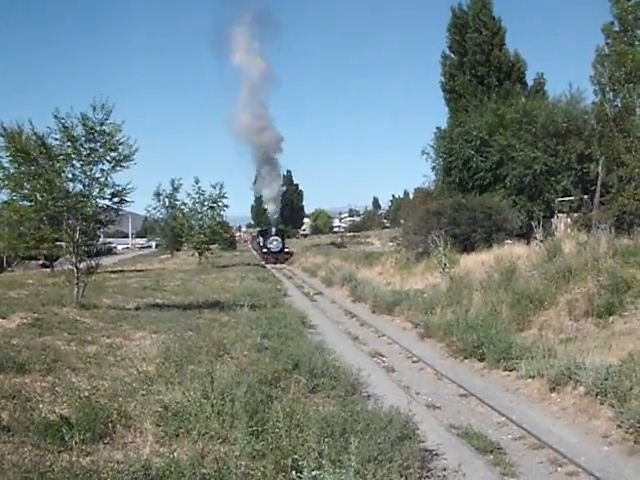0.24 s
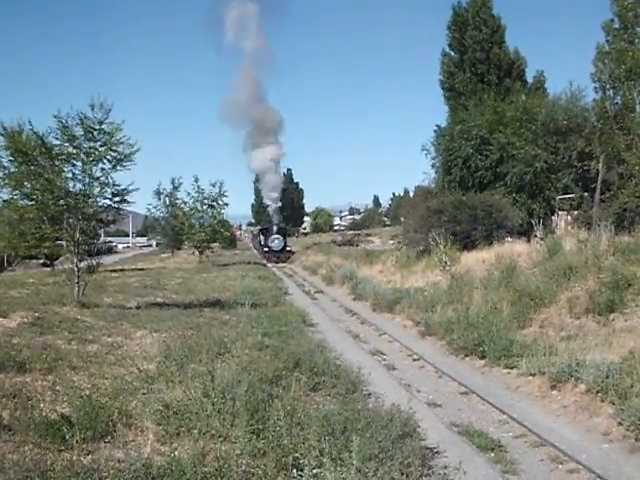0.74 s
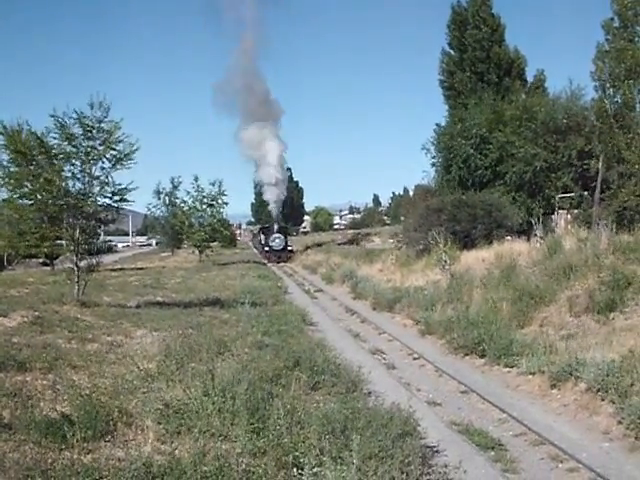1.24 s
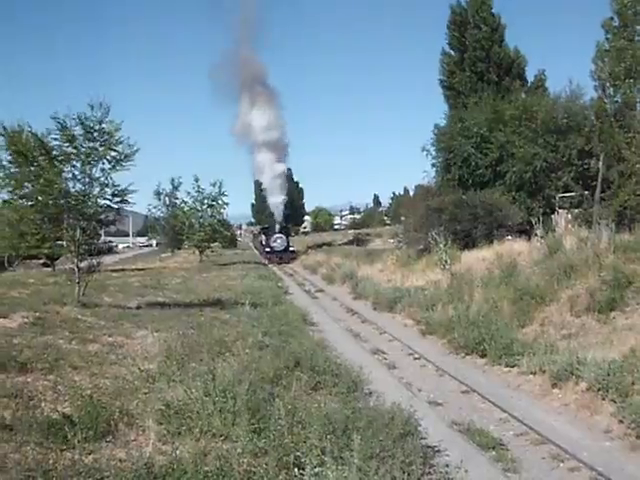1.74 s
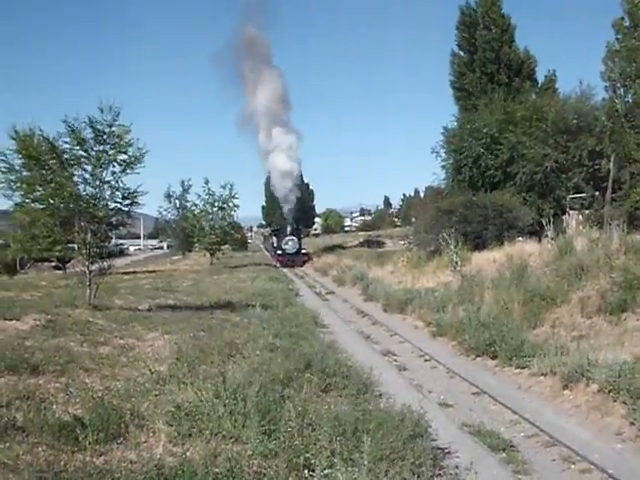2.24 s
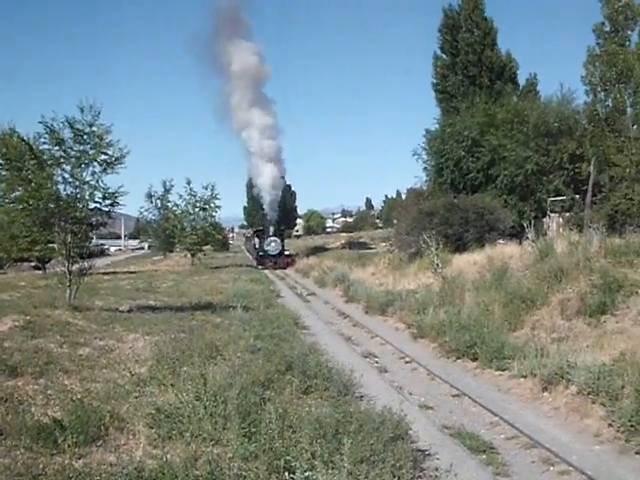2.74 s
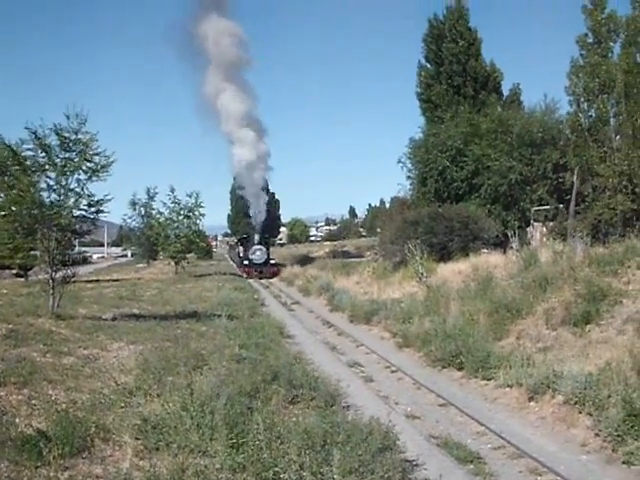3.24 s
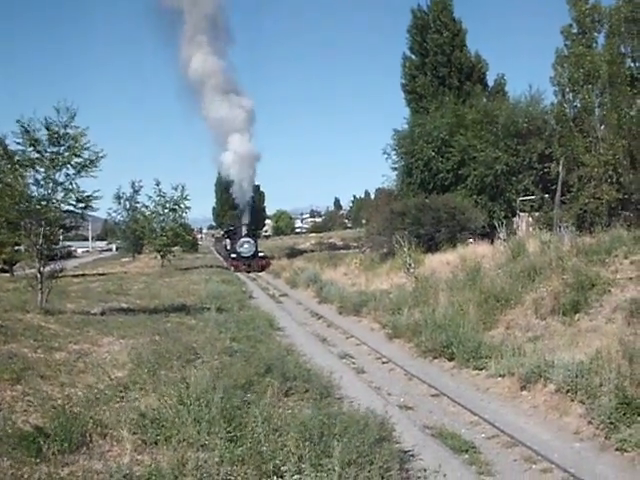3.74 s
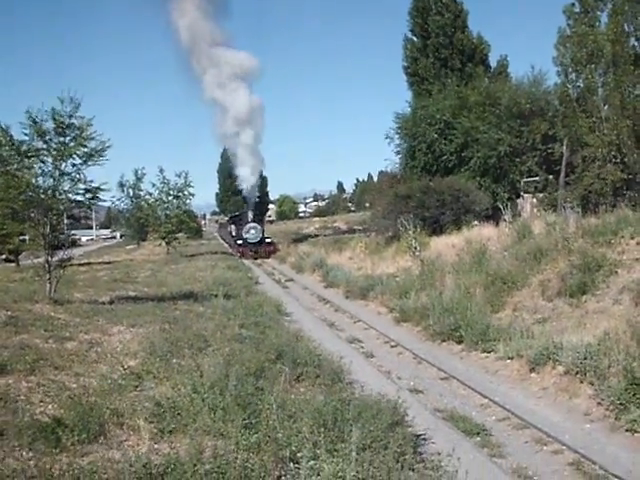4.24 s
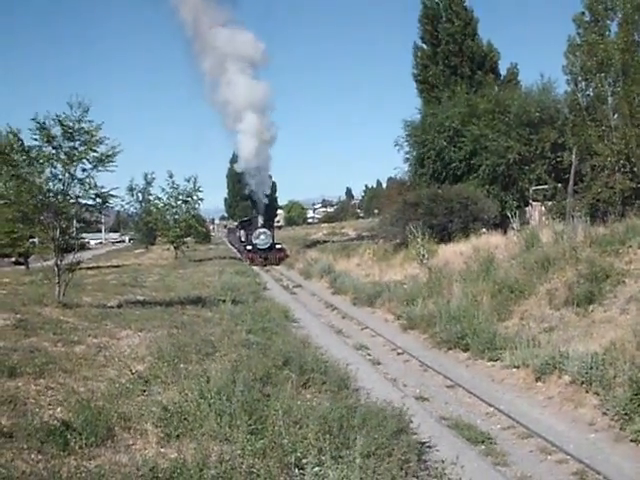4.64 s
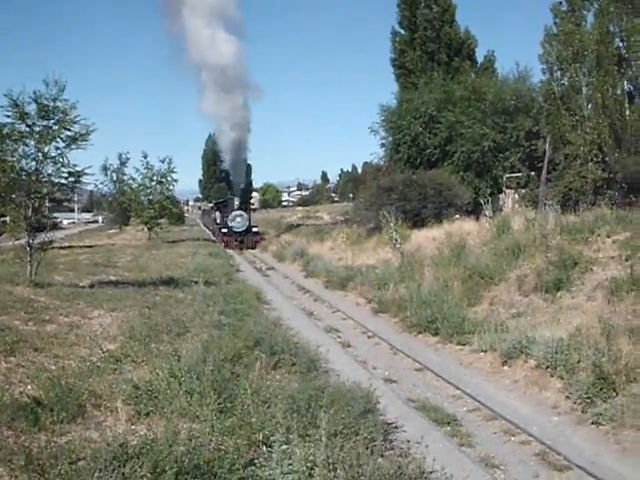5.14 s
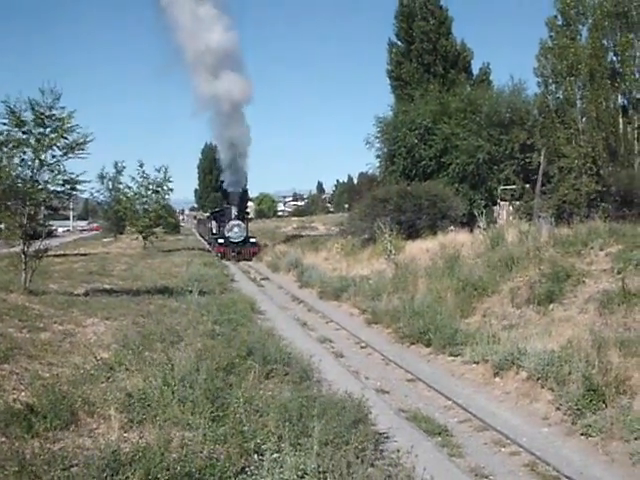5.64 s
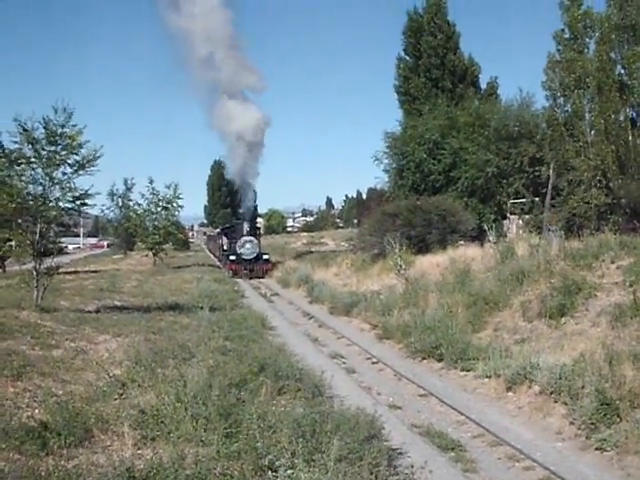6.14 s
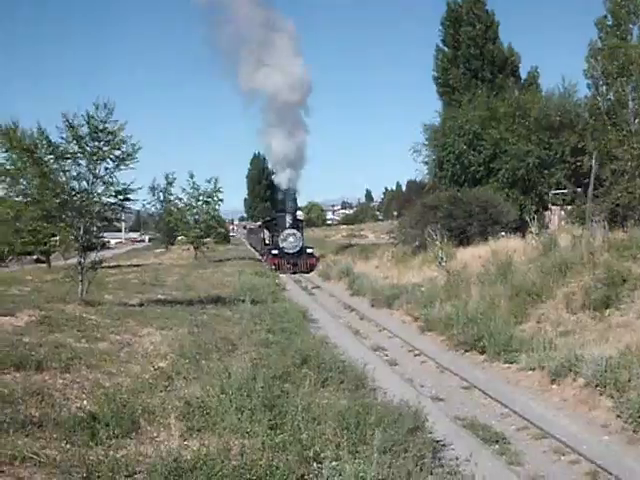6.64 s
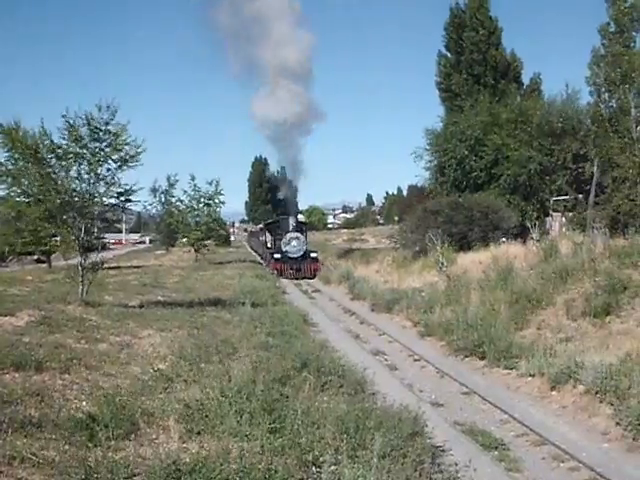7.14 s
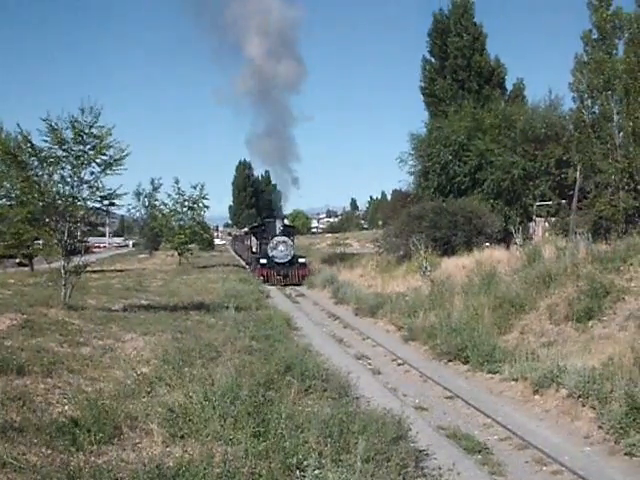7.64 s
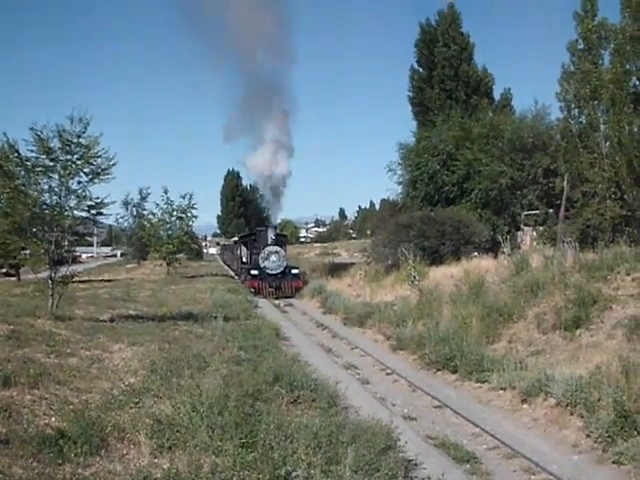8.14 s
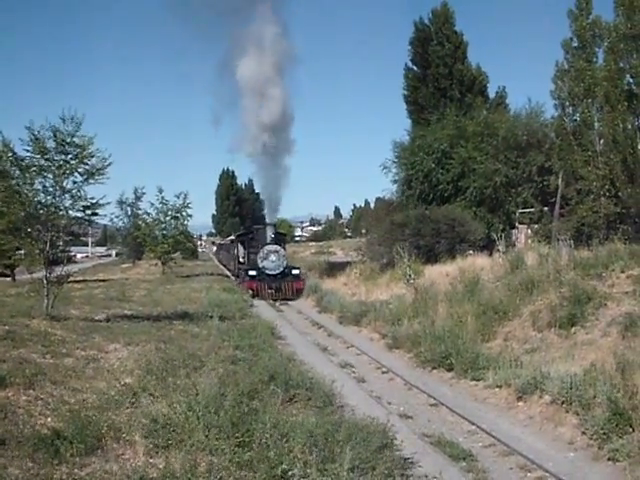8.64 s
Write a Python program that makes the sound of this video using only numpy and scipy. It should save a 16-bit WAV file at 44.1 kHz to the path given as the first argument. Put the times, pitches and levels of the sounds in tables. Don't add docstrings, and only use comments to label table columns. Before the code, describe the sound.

Open grassland, with a fixed microphone in the wind. From 0 s a small steam locomotive chuffs far away, faint under low, lumpy wind thumps. The puffs are rapid and regular, about five per second, in groups of four lasting roughly 0.8 s, each slightly different in weight, boomy and raspy with faint tree echoes. A thin bright steam hiss flickers and sputters, with soft breathy whistles swelling around 1-3 s. From 3 to 5 s the chuffs rise and the hiss strengthens, spitting small ticks. Between 5 and 7 s the engine closes in: blasts are firmer and fuller, a duller roar pulses with them, and droplet clicks sharpen, the brightest near 7.1 s. The hiss gains a gradually finer, hollow, shifting colour from ground reflection. From 7 to 8.9 s chuffing and steam are loudest, the pace barely quicker, and heavy gusts buffet hardest at the end, the engine still approaching.

```python
import sys
import numpy as np
from scipy import signal
from scipy.fft import rfft, irfft, next_fast_len
from scipy.io import wavfile
from scipy.ndimage import uniform_filter1d

SR = 44100
rng = np.random.default_rng(int(sys.argv[2]) if len(sys.argv) > 2 else 0)


def to_wav(s):
    ch = np.atleast_2d(s).T
    pcm = np.round(np.clip(ch, -1, 1) * 32767)
    wavfile.write(sys.argv[1], SR, pcm.astype(np.int16))


def ratio(d):
    e = np.asarray(d, float) / 20
    return 10 ** e


N = 392490
T = np.arange(N) / SR

# [t/s, nearness 0-1]
NEARNESS = [
    (0, 0.07),
    (1.5, .1),
    (3, .2),
    (4.5, 0.38),
    (6, 0.77),
    (7.5, .92),
    (8.9, 0.97),
]
# [t/s, level/dB of each of the four blasts]
TURNS = [(0.079, -53, -49.5, -58, -53.5), (0.884, -53, -51, -56, -50.5), (1.676, -52.5, -48.5, -56, -51.5),
         (2.473, -50, -47.5, -52.5, -51), (3.255, -49, -48.5, -52.5, -48.5), (4.044, -47.5, -47, -51, -47),
         (4.826, -45, -43.5, -49.5, -46.5), (5.596, -43.5, -43, -49, -43.5), (6.369, -42, -38, -45.5, -42),
         (7.133, -40.5, -38, -45, -43), (7.888, -41, -37.5, -44, -40), (8.64, -39, -35.5, -43, -39)]
# [place in the turn 0-1, length/s, boom level/dB, rasp level/dB]
STROKES = [
    (0.0, 0.044, 0.9, 0.2),
    (0.217, 0.029, 1, -0.6),
    (0.46, 0.04, 3.5, -0.6),
    (.74, 0.032, 0, -0.7),
]
BOOMS = [(1.5, -1.5, 0.5, -1.5), (2.5, -1, -6, -.5), (2.5, -5, 2, 1.5), (-1.5, 0, -5, 2.5),
         (-7.5, 1.5, 0, 0), (-6.5, -.5, 0, 2), (-4, 1, 3, 2.5), (0.5, -1, 0, -1), (1, -1, 1.5, -3),
         (-0.5, 2, .5, 1), (2.5, -4.5, -1, -3), (0.5, -2.5, .1, .1)]
RASPS = [(1.5, -0.5, 2, -4), (-2, -1, -4, -1.5), (1.6, -.5, .1, 0.5), (0.89, 0, -1.5, 1.5),
         (1.1, 1.5, 0.5, -2), (1.1, 0, -1.5, -1), (-0.11, .5, 1.5, -1), (-2, 1, 3, -2), (-1, -2, 2, -1),
         (-0.82, -1.5, 1.5, 0), (1.5, 1, -3, -1), (-1.2, 1.5, .1, .1)]
# [f/Hz, width/Hz, level/dB]
SMOKEBOX = [(159.9, 21.8, 2), (184, 48, -7), (99, 29.5, -4)]
BLASTPIPE = [(274.7, 17, 0)]
CHIMNEY = [(446.6, 79, -6.5), (532, 55, 1), (630, 104, 0), (707, 96, -3.5)]
RASP = [(934, 152, 4.5), (1140, 212, -0.5), (1590, 200, -4.5), (2055, 100, 1), (2380, 450, -15.5)]
# [lag/s, level/dB]
TREE_ECHOES = [
    (.045, -14.5),
    (0.079, -13),
    (.125, -16.5),
]
# [t/s, level/dB]
JET_LEVEL = [(0.0, -43), (0.25, -44.5), (0.62, -40.5), (1.09, -47.5), (1.21, -45.5), (2.15, -43),
             (2.65, -43.5), (3.67, -41), (3.74, -37.5), (4.21, -42), (5.15, -37), (5.48, -39),
             (6.32, -35.5), (6.39, -37.5), (7.06, -36), (7.49, -37.5), (8.48, -35), (8.9, -33.5)]
# [f/Hz, level/dB per Hz]
JET = [(1530, -18), (2600, -12.5), (2800, -12.5), (3640, -3.5), (4200, -5.5), (4810, 0), (5420, -2.5),
       (7370, -3), (8630, -5.5), (9500, -10), (10400, -18.5), (11500, -25), (13000, -28.5), (15600, -30.5)]
ROAR = [(700, -8), (1100, 7), (1500, 2.5), (2000, 0.5), (2500, -0.5), (3000, -1.5), (3800, 3)]
# [f/Hz, width/Hz, lift/dB]
JET_WHISTLES = [(3640, 41, 5.5), (4000, 45, 2), (4750, 240, 1.5)]
ROAR_RINGS = [(1500, 140, 5), (2100, 560, 9.5), (2380, 86, 6)]
# [t/s, length/s, lift/dB]
SURGES = [(0.603, 0.053, 0), (0.761, 0.021, 1.5), (1.379, 0.076, 2.4), (1.535, 0.017, 3),
          (1.621, 0.049, 2.5), (1.819, 0.092, 1.5), (1.931, 0.019, 3.5), (2.127, 0.079, 1.5),
          (3.786, 0.09, 1.5), (3.919, 0.017, 1.8), (4.445, 0.017, 1.5), (4.571, 0.024, 2.4),
          (4.924, 0.059, 2), (5.109, 0.014, 2.5), (5.221, 0.025, 3), (5.628, 0.027, 1), (5.909, 0.044, 1.5),
          (6.236, 0.086, 0.5), (6.678, 0.053, 2), (7.155, 0.049, 2.6), (7.576, 0.033, 1),
          (8.167, 0.042, 0.5), (8.402, 0.02, 1.5), (8.556, 0.033, 2.0)]
# [t/s, length/s, f/Hz, level/dB re jet]
FLARES = [(0.498, 0.27, 5300, -20), (1, 1, 3610, -14.5), (1.2, 0.55, 2176, -15.5), (1.8, 0.77, 4490, -9),
          (1.9, 0.37, 3400, -8.5), (2, 0.47, 5580, -6), (2.2, 0.46, 2460, -14.5), (3, 0.92, 2050, -13),
          (3.1, 0.86, 4000, -11), (3.8, 0.27, 4810, -12), (4.4, 0.21, 3560, -12),
          (4.402, 0.43, 4490, -10.5), (4.5, 0.32, 5570, -14), (5, 1, 1600, -16), (5.1, 0.31, 5230, -8),
          (5.6, 0.26, 2380, -10.5), (5.796, 0.22, 3305, -6.5), (6.4, 0.51, 1590, -15),
          (6.5, 0.66, 2380, -9.5), (6.6, 0.65, 5750, -15), (7, 0.37, 4920, -10), (7.7, 1, 1586, -11.5),
          (8.4, 0.19, 4750, -6), (8.4, 0.22, 5700, -5.5), (8.6, 0.83, 1500, -13.5)]
# [t/s, peak level/dB]
TICKS = [(1.2084, -56), (1.3603, -57), (2.1355, -48), (2.2264, -54), (3.6915, -49), (4.348, -52),
         (4.9736, -47), (5.2264, -47), (5.4964, -49), (5.8014, -44), (5.9208, -46), (6.2474, -51),
         (6.4097, -47), (6.7924, -46), (7.1397, -40), (7.2424, -46), (8.4024, -49), (8.7334, -45)]
# [t/s, notch spacing f/Hz, strength 0-1, phase turn by the soft soil/cycles]
GROUND = [
    (0, 1396, 0.22, 0.23),
    (1.5, 1336, 0.3, 0.049),
    (3, 1180, 0.3, 0.21),
    (4, 1023, 0.5, 0.17),
    (5, 939, 0.57, 0.29),
    (6, 855, 0.52, 0.33),
    (7, 798, 0.62, 0.36),
    (8.9, 767, 0.33, 0.45),
]
# [t/s, level/dB]
BREEZE = [(0.0, -43), (1.41, -41.5), (1.68, -44), (2.13, -42), (3.49, -38), (3.82, -41), (5.28, -39),
          (5.55, -42), (5.85, -36), (6.77, -43.5), (7.31, -37), (8.9, -38)]
# [t/s, length/s, level/dB]
GUSTS = [(0.286, 0.037, -34), (0.435, 0.024, -40), (0.746, 0.03, -31.5), (1.01, 0.036, -32.5),
         (1.159, 0.031, -32.5), (1.33, 0.036, -33), (1.542, 0.033, -34.5), (1.873, 0.034, -34),
         (2.022, 0.037, -35.6), (2.523, 0.051, -33.5), (2.985, 0.065, -39), (3.347, 0.036, -30.5),
         (4.472, 0.029, -38), (4.686, 0.065, -35), (5.225, 0.065, -37), (5.435, 0.029, -30.5),
         (5.673, 0.031, -32.5), (5.834, 0.042, -30), (6.41, 0.023, -30.5), (6.671, 0.024, -32),
         (6.83, 0.032, -31.5), (7.009, 0.028, -35), (7.183, 0.045, -30), (7.406, 0.039, -33),
         (7.55, 0.022, -32), (7.757, 0.021, -31.8), (7.898, 0.02, -29.8), (8.177, 0.059, -27.5),
         (8.53, 0.059, -29), (8.87, 0.03, -24)]
# [f/Hz, level/dB per Hz]
WIND = [(5, -5), (10, 1.5), (22, -0.5), (38, 1.5), (52, -4.5), (65, -9), (100, -15.5), (135, -23),
        (200, -22.5), (260, -36), (350, -39), (500, -60)]

# (dB when far, dB when near)
BOOM_RE_BLAST_DB, RASP_RE_BLAST_DB, PIPE_RE_CHIMNEY_DB = (12, 4), (3.5, -8), (-1, -18)
DRAUGHT_BOOM_DB, DRAUGHT_CHIMNEY_DB, DRAUGHT_RASP_DB = (-60, -42.5), (-66.5, -56), (-62, -60)
ROAR_DB, ROAR_BLAST_DB = (-51, -44.5), (-2.5, -2.5)
BOOM_PITCH_RISE = 0.06
FLARE_WIDTH_HZ, FLARE_WIDTH_SHARE = 94, 0.017
TOP_PATCH_SHARE = 0.52
GRIT_STEEPNESS = 0.6
OFFSET = 0.0094


def exhaust():
    *_, boom_db, rasp_db = np.transpose(STROKES)
    flutter = ratio(1.53 * drift(35.0))

    boom_power = puffs(0.0093, 0.95, 1.96, boom_db + BOOMS) * ratio(2 * with_nearness(BOOM_RE_BLAST_DB))
    boom = np.sqrt(boom_power + ratio(2 * with_nearness(DRAUGHT_BOOM_DB)))
    chimney = np.sqrt(puffs(-0.016, 0.69, 1.7) + ratio(2 * with_nearness(DRAUGHT_CHIMNEY_DB)))
    rasp_power = puffs(-0.006, 0.79, 1.21, rasp_db + RASPS) * ratio(2 * with_nearness(RASP_RE_BLAST_DB))
    rasp = np.sqrt(rasp_power + ratio(2 * with_nearness(DRAUGHT_RASP_DB)))

    cavity = resonate(resonate(rng.standard_normal(N), SMOKEBOX), [(158, 117, 0)])
    pace = np.cumsum(1 + BOOM_PITCH_RISE * in_time(NEARNESS)[0])
    cavity = np.interp(pace * (N / pace[-1]), np.arange(N), cavity)
    cavity = rms_one(signal.sosfilt(signal.butter(2, 240, fs=SR, output="sos"), cavity))
    low = ratio(-1.62) * boom * steadied(cavity, share=0.39)

    mid = resonate(rng.standard_normal(N) * chimney * flutter, CHIMNEY) * np.sqrt(np.mean(chimney ** 2))
    mid = ratio(1.0) * signal.sosfilt(signal.butter(2, 900, fs=SR, output="sos"), mid)
    top = resonate(rng.standard_normal(N) * rasp * flutter, RASP) * np.sqrt(np.mean(rasp ** 2))
    pipe = resonate(resonate(rng.standard_normal(N), BLASTPIPE), [(288, 99, 0)])
    pipe = pipe * chimney * ratio(with_nearness(PIPE_RE_CHIMNEY_DB))
    return low + pipe + mid, ratio(1.0) * top


def puffs(late, rise, fall, trims_db=np.zeros((1, 1))):
    out, starts = np.zeros(N), np.array(TURNS)[:, 0]
    periods = np.diff(starts, append=2 * starts[-1] - starts[-2])
    for start, period, levels_db in zip(starts, periods, np.array(TURNS)[:, 1:] + trims_db):
        for db, (place, length, *_) in zip(levels_db, STROKES):
            s = start + place * period
            near = slice(max(int((s - 0.2) * SR), 0), int((s + 0.3) * SR))
            since = (T[near] - s - late) / length
            out[near] += ratio(2 * db) * np.exp(-(since / np.where(since < 0, rise, fall)) ** 2)
    return out


def trees(x):
    return sum(ratio(db) * np.concatenate([np.zeros(int(lag * SR)), x])[:N] for lag, db in TREE_ECHOES)


def steam():
    surge_db = bells(SURGES, lambda db: db)
    jet_db = in_time(JET_LEVEL)[0] - 0.6 + surge_db
    blast_power = puffs(0.003, 0.87, 1.5) * ratio(2 * with_nearness(ROAR_BLAST_DB))
    swell = np.sqrt(ratio(2 * with_nearness(ROAR_DB)) + blast_power)
    sputter_db = 0.6 * drift(40.0) + 1.02 * drift(140.0)
    jet = ratio(sputter_db - 0.11) * coloured(JET, JET_WHISTLES, patchy_db=1.83, patch_rate=18.5,
                                            count=12, top_share=TOP_PATCH_SHARE)
    roar = coloured(ROAR, ROAR_RINGS, patchy_db=3.5, patch_rate=28.0, count=8)
    grit = rms_one(signal.sosfilt(signal.butter(4, 10800, "high", fs=SR, output="sos"), jet ** 3))
    fine = flares() + ratio(-36) * droplets() + ratio(-31 + GRIT_STEEPNESS * surge_db) * grit
    return ratio(jet_db) * jet + ratio(-3.0) * swell * roar, ratio(jet_db) * fine


def flares():
    out, air, flecks_db = np.zeros(N), rng.standard_normal(N), 4.2 * drift(20.0)
    for k, (s, length, hz, db) in enumerate(FLARES):
        width = FLARE_WIDTH_HZ + FLARE_WIDTH_SHARE * hz
        near = slice(max(int((s - 2 * length) * SR), 0), int((s + 2 * length) * SR))
        breath = resonate(resonate(air[near], [(hz, width, 0)]), [(hz, 2 * width, 0)])
        own_db = np.roll(flecks_db, k * N // len(FLARES))[near]
        out[near] += ratio(db + own_db - 2.3) * breath * np.exp(-((T[near] - s) / length) ** 2)
    return out


def droplets():
    spits = rng.random(N) < 150 / SR
    sizes = ratio(5.0 * np.minimum(rng.exponential(1, N), 3))
    spray = spits * sizes * rng.choice([-1, 1], N)
    return rms_one(signal.sosfilt(signal.butter(2, 7000, "high", fs=SR, output="sos"), spray + 1e-18))


def ticks():
    clicks = np.full(N, 1e-18)
    clicks[[round(s * SR) for s, db in TICKS]] = ratio(np.array(TICKS)[:, 1] + 8.0)
    return signal.sosfilt(signal.butter(2, 6500, "high", fs=SR, output="sos"), clicks)


def over_ground(x):
    spacing, strength, turn = in_time(GROUND)
    lag = SR / spacing * (1 + 0.034 * drift(2.4))
    dull = signal.sosfiltfilt(signal.butter(1, [500, 5500], "band", fs=SR, output="sos"), x)
    turned = np.real(signal.hilbert(dull, next_fast_len(N))[:N] * np.exp(2j * np.pi * turn))
    return x - np.clip(strength, 0, 1) * np.interp(np.arange(N) - lag, np.arange(N), turned)


def wind():
    power = ratio(2 * in_time(BREEZE)[0] + 7.5) + bells(GUSTS, lambda db: ratio(2 * db))
    rumble = coloured(WIND, patchy_db=-0.4, patch_rate=9.7, count=3)
    return ratio(0.22) * np.sqrt(power) * steadied(rumble, share=0.58, size=2600)


def with_nearness(far_near_db):
    far_db, near_db = far_near_db
    return far_db + (near_db - far_db) * in_time(NEARNESS)[0]


def in_time(rows):
    s, *columns = np.transpose(rows)
    return [np.interp(T, s, c) for c in columns]


def bells(rows, height):
    out = np.zeros(N)
    for s, length, db in rows:
        near = slice(max(int((s - 3 * length) * SR), 0), int((s + 3 * length) * SR))
        out[near] += height(db) * np.exp(-((T[near] - s) / length) ** 2)
    return out


def drift(rate):
    r = np.exp(-32 * np.pi * rate / SR)
    slow = signal.lfilter([1], [1, -2 * r, r * r], rng.standard_normal(N // 16 + 3002))[3000:]
    return np.interp(np.arange(N) / 16, np.arange(len(slow)), rms_one(slow))


def resonate(x, modes):
    out = 0
    for k, (hz, width, db) in enumerate(modes):
        r = np.exp(-np.pi * width / SR)
        poles = [1, -2 * r * np.cos(2 * np.pi * hz / SR), r * r]
        out = out + (-1) ** k * ratio(db) * signal.lfilter([1 - r * r, 0, r * r - 1], poles, x)
    return rms_one(out)


def coloured(spectrum, lifts=(), patchy_db=0., patch_rate=8., count=1, top_share=1):
    hz = np.maximum(np.arange(N // 2 + 1) * SR / N, 1)
    points = np.array(spectrum)
    level = np.interp(np.log(hz), np.log(points[:, 0]), points[:, 1], left=-90, right=-90)
    for peak_hz, width, db in lifts:
        level = level + db / (1 + (2 * (hz - peak_hz) / width) ** 2)
    tone = ratio(level) * rfft(rng.standard_normal(N))
    place = np.interp(np.log(hz), np.log(points[[0, -1], 0]), [0, count - 1])
    flicker_db = np.linspace(patchy_db, top_share * patchy_db, count)
    out = np.zeros(N)
    for k in range(count):
        band = irfft(tone * np.maximum(1 - abs(place - k), 0), N)
        out += band * ratio(flicker_db[k] * drift(patch_rate))
    return rms_one(out)


def steadied(x, share, size=900):
    power = uniform_filter1d(x ** 2, size=size) + 0.05
    return rms_one(x / power ** (np.clip(share, 0, 1) / 2))


def rms_one(x):
    return x / np.sqrt(np.mean(x ** 2) + 1e-20)


def scene():
    body, rasp = exhaust()
    hiss, whistles = steam()
    engine = body + trees(rasp) + whistles + ticks() + over_ground(rasp + hiss)
    return (engine + wind())[None]


def band_limit(x):
    return signal.sosfilt(signal.butter(12, 15750, fs=SR, output="sos"), x)


def record(dry):
    mix = dry + OFFSET
    return band_limit(mix)


dry = scene()
out = record(dry)
to_wav(out)
```